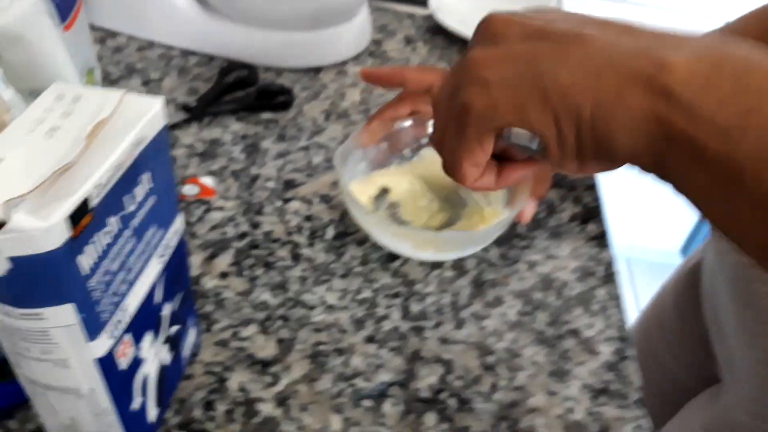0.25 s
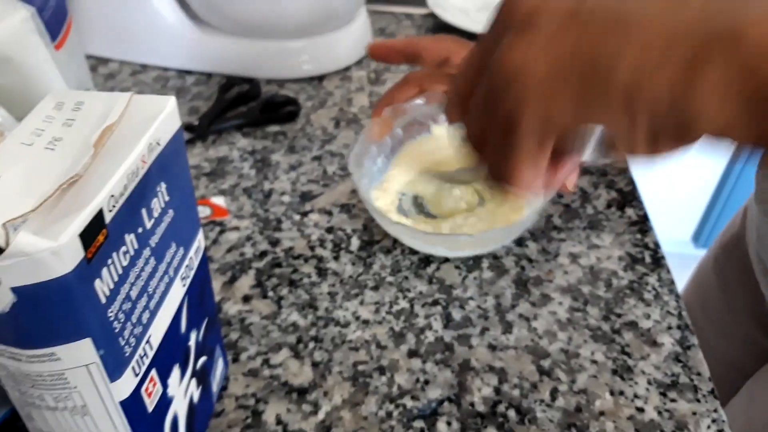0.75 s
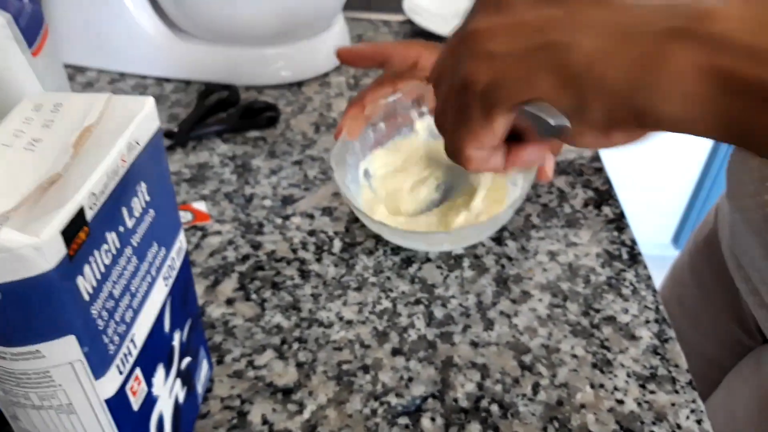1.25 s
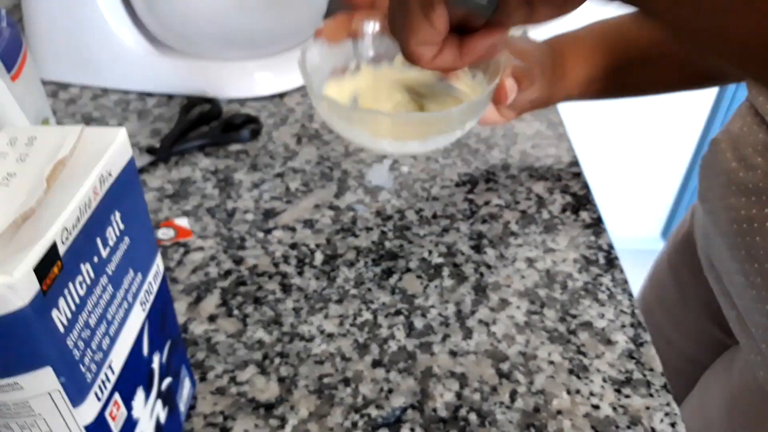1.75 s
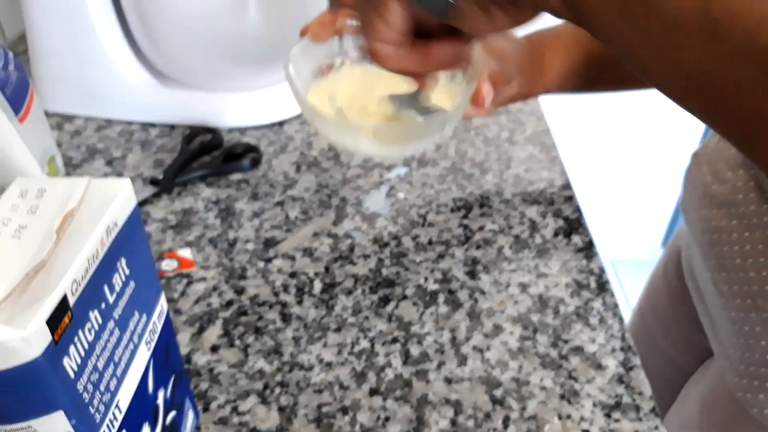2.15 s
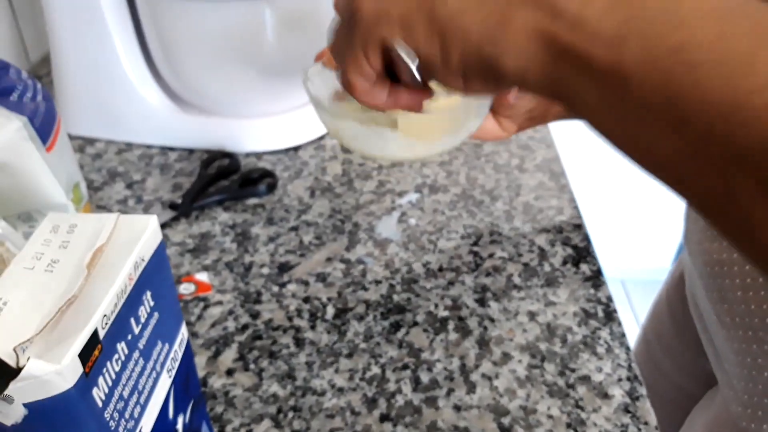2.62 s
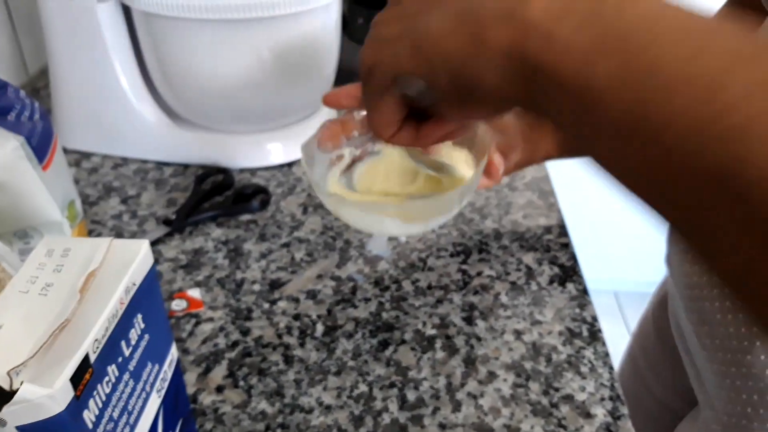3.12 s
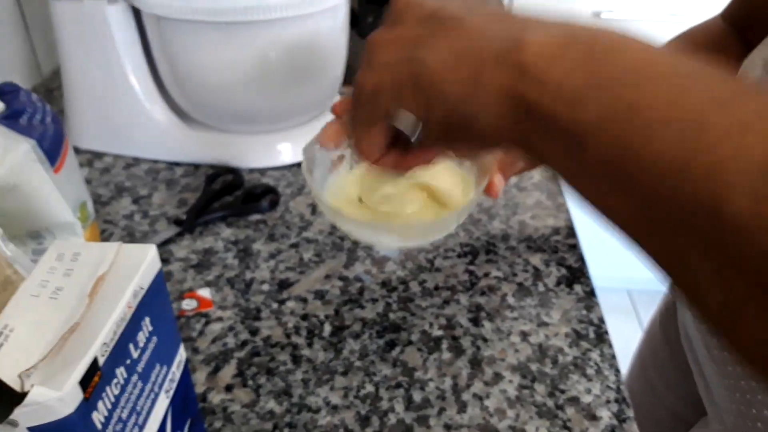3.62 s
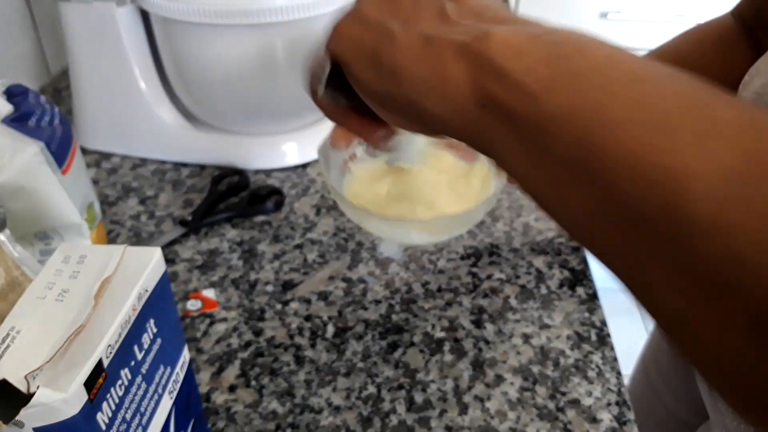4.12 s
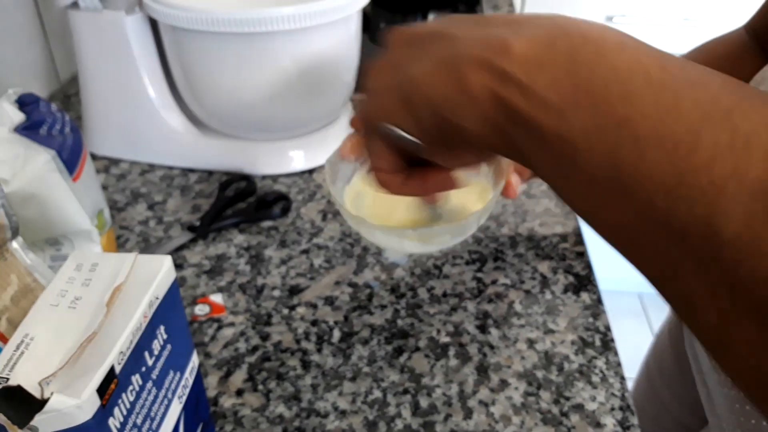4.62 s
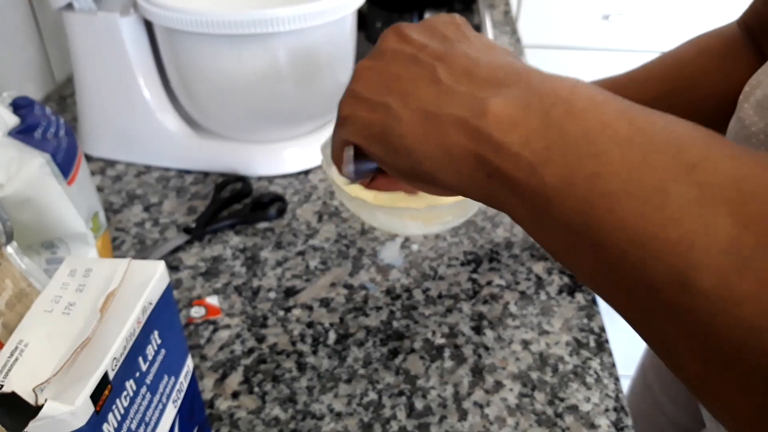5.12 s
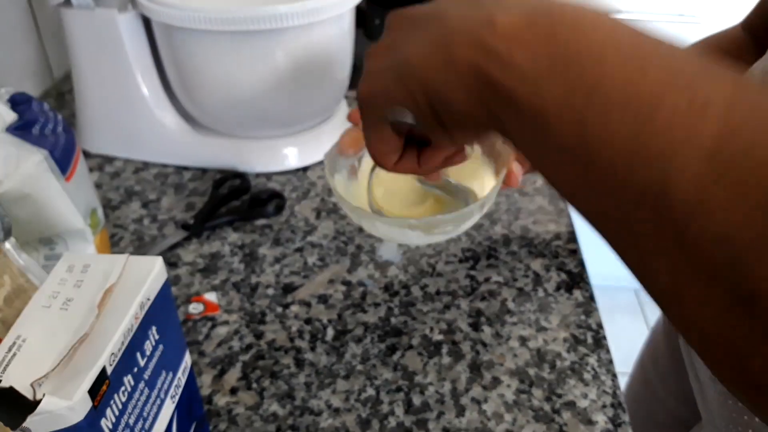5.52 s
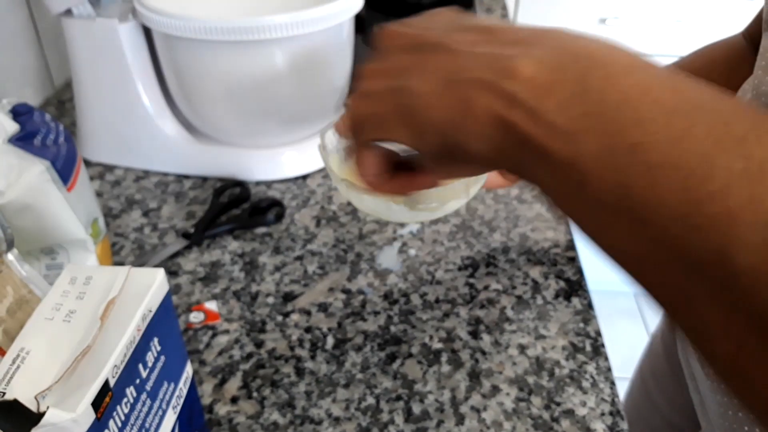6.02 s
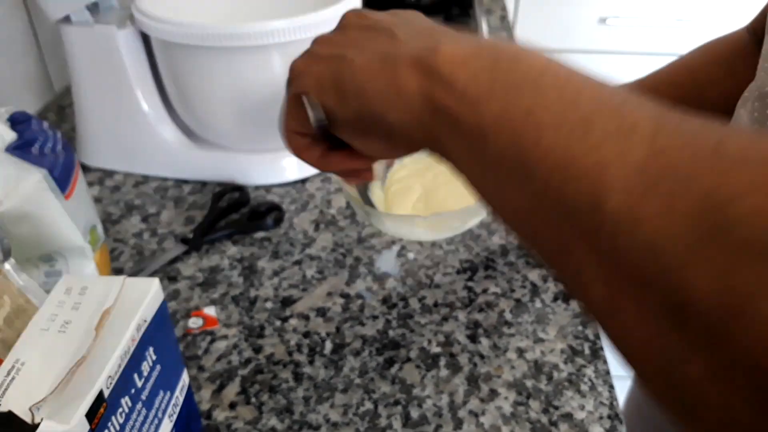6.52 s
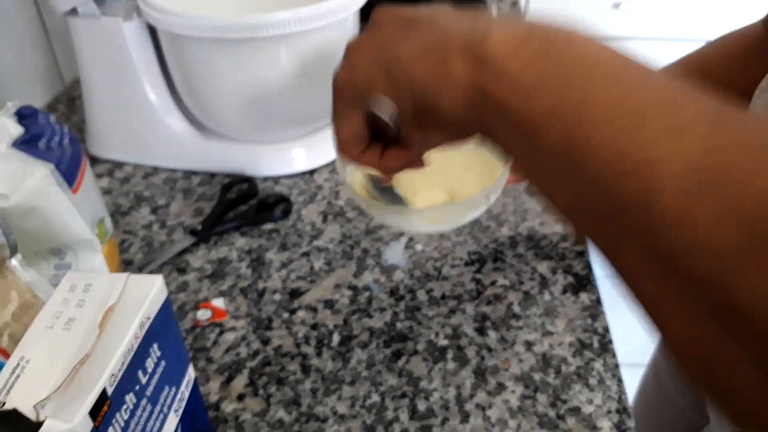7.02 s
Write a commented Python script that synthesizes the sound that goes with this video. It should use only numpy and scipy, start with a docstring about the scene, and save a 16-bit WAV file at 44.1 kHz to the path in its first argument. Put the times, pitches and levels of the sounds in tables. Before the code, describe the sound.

A metal spoon stirs thick paste in a small glass bowl, making short, bright, chattering clinks about four times a second. Between them the paste squelches softly and the spoon scrapes the glass. At first the bowl knocks and slides on a stone counter; then small wet smacks join in, along with a couple of faint squeaks near the end. The sound is close, in a quiet kitchen with a faint hum.

```python
"""A metal spoon stirs thick paste in a small hand-held glass bowl, in a hard-walled, faintly humming
kitchen. For the first second and a half the bowl knocks and slides on the stone counter. Throughout,
about four strokes a second, impacts excite the modes of the glass in chattering clinks, and between them
the paste squelches and the spoon rubs and grazes the wall. From about one second on, air pockets burst
with wet smacks. Stick-slip friction squeaks faintly near the start and twice more towards the end."""
import sys
import numpy as np
from scipy import signal
from scipy.fft import rfft, irfft, next_fast_len
from scipy.io import wavfile
from scipy.ndimage import uniform_filter1d, minimum_filter1d

SR = 44100
rng = np.random.default_rng(int(sys.argv[2]) if len(sys.argv) > 2 else 0)


def generate_wav(sig):
    """Save sig (samples, or channels by samples) to the path in sys.argv[1] as 16-bit PCM at SR."""
    pcm = np.round(np.clip(np.atleast_2d(sig).T, -1, 1) * 32767).astype(np.int16)
    wavfile.write(sys.argv[1], SR, pcm)


N = 320166
TIME_S = np.arange(N) / SR
CONTACT_N = int(.45 * SR)  # samples given to one contact and its decay
CONTACT_S = np.arange(CONTACT_N) / SR


def from_db(db):
    """Amplitude ratio of a level in decibels."""
    return 10 ** (np.asarray(db) / 20)


def unit(x):
    """Normalisation to unit energy."""
    return x / np.sqrt(np.sum(x ** 2) + 1e-20)


def colour(x, spectrum):
    """Minimum-phase filter: folding the cepstrum makes the (frequency_hz, gain_db) response causal."""
    size = 2 * next_fast_len(len(x) // 2 + CONTACT_N // 4)
    hz, db = np.transpose(spectrum)
    gain_db = np.interp(np.log(np.fft.rfftfreq(size, 1 / SR) + 1), np.log(hz), db)
    cepstrum = irfft(np.log(from_db(gain_db)))
    cepstrum[1:size // 2] *= 2
    cepstrum[size // 2 + 1:] = 0
    return irfft(rfft(x, size) * np.exp(rfft(cepstrum)))[:len(x)]


def decay(t60):
    """Damping: an exponential fall of 60 dB in t60 seconds."""
    return from_db(-60 * CONTACT_S / t60)


def reverberation(t60):
    """A diffuse field responds to an impulse with decaying noise."""
    return unit(rng.standard_normal(CONTACT_N) * decay(t60))


def click(spectrum):
    """Impulse response of the given spectrum, at unit energy."""
    return unit(colour(1.0 * (CONTACT_S == 0), spectrum))


def radiate(x, low_hz):
    """Radiation efficiency: small bodies give off little bass."""
    highpass = signal.butter(2, low_hz, "high", fs=SR, output="sos")
    return signal.sosfilt(np.tile(highpass, (2, 1)), x)


def drift(per_s):
    """Random modulation: straight lines between Gaussian values."""
    knots = rng.standard_normal(int(per_s * N / SR) + 2)
    return np.interp(TIME_S * per_s, np.arange(len(knots)), knots)


def kitchen(source, near_db=-2, near_t60=0.13, tail_db=-1, tail_t60=0.28, directions=3):
    """Superposition of direct sound, counter echoes and room tail; each direction draws source() anew."""
    out = source()
    for _ in range(directions):
        near = from_db(near_db) * reverberation(near_t60)
        tail = from_db(tail_db) * reverberation(tail_t60)
        echoes = (near + tail) / np.sqrt(directions)
        out = out + signal.fftconvolve(source()[:CONTACT_N // 4], echoes)[:len(out)]
    return out


def chatter(body, settle_s, rebounds_per_s=9000):
    """Convolution with a dying run of tiny rebounds as a contact settles; unit energy."""
    rebounds = (rng.random(CONTACT_N) < rebounds_per_s / SR) * rng.standard_normal(CONTACT_N)
    rebounds[0] = 1
    onset = 1 - np.exp(-(CONTACT_S + 1 / SR) / .0002)
    force = rebounds * onset * np.exp(-CONTACT_S / (settle_s + .0006))
    return unit(signal.fftconvolve(body, force[:CONTACT_N // 4])[:CONTACT_N])


def grains(spectrum, per_s, clump_db, q, bands=24):
    """Shot noise: clumps of tiny impulses excite resonators and are blurred by the room; rms 1."""
    pops, shared = np.zeros(N), drift(70)
    for hz in np.geomspace(max(spectrum[0][0], 80), min(spectrum[-1][0], 15000), bands):
        born = rng.random(N) < per_s / SR / bands
        clumps = np.clip(.6 * shared + .8 * drift(110), -2, 2.3)
        impulses = np.full(N, 1e-18)
        impulses[born] = from_db(clump_db * clumps[born]) * rng.standard_normal(N // 4)[:born.sum()]
        b, a = signal.iirpeak(hz, q, fs=SR)
        pops += np.sqrt(hz) * unit(signal.lfilter(b, a, signal.lfilter(b, a, impulses)))
    echoes = signal.fftconvolve(pops, from_db(-0.5) * reverberation(t60=0.086))[:N]
    return np.sqrt(N) * unit(colour(pops + echoes, spectrum))


# Limits of the five bands that set a contact's timbre: edge_hz
BAND_EDGES = [300, 800, 2800, 5200, 10000, 16000]
def place(track, start_s, sound, band_db):
    """Equalisation brings a contact's first 25 ms to five band levels; it is mixed in at start_s."""
    count, size = int(.025 * SR), next_fast_len(2 * CONTACT_N)
    hz = np.fft.rfftfreq(size, 1 / SR)
    centres_hz = np.sqrt(np.multiply(BAND_EDGES[:-1], BAND_EDGES[1:]))
    for _ in range(2):
        power = 2 * abs(rfft(sound[:count], size)) ** 2 / (size * count)
        now_db = 10 * np.log10(np.histogram(hz, BAND_EDGES, weights=power)[0] + 1e-20)
        sound = colour(sound, np.column_stack([centres_hz, band_db - now_db]))
    at = round(start_s * SR)
    track[at:at + len(sound)] += sound[:N - at]


# Normal modes of bowl and spoon: pitch_hz, level_db
GLASS_MODES = [(1000, -4.5), (1255, -14.5), (1492, -6), (1797, -15.5), (2205, -16.5), (3565, -9),
               (3770, -6), (4000, -24), (4290, -8), (4720, -11), (6100, 2), (6760, -3.5), (8150, -16),
               (8620, 6), (9030, 1), (11310, -5)]
def ring(modes=GLASS_MODES, t60=0.03, detune=0.0083):
    """Modal vibration: damped sines whose strength and pitch vary with grip and contact point."""
    hz, db = np.transpose(modes)
    hz = hz * (1 + detune * rng.normal(size=len(hz)))
    gains = from_db(db + 3 * rng.normal(size=len(hz))) * rng.choice([-1, 1], len(hz))
    count = CONTACT_N // 4
    waves = gains @ np.sin(2 * np.pi * hz[:, None] * CONTACT_S[:count])
    return unit(np.pad(waves, (0, CONTACT_N - count)) * decay(t60))


# Spectrum of the quiet kitchen: frequency_hz, density_db
AIR_SPECTRUM = [(20, -13), (105, 14), (260, -2.5), (600, 1), (1200, -13), (3000, 0), (16000, -2.5)]
def room_tone(air_db=-63.5, hum_hz=104, hum_db=-80):
    """Ambient noise floor: broadband air and the pure tone of an appliance's hum."""
    air = np.sqrt(N) * unit(colour(rng.standard_normal(N), AIR_SPECTRUM))
    return from_db(air_db) * air + from_db(hum_db) * np.sin(2 * np.pi * hum_hz * TIME_S)


# Envelope of the bowl's slide: time_s, level_db
SLIDE_LEVELS = [(0, -29.5), (.17, -51), (.27, -38.5), (.52, -48), (.76, -46), (1.03, -65.5), (1.23, -53.5),
                (1.32, -50), (1.5, -66)]
# Spectrum of glass on stone: frequency_hz, density_db
SLIDE_SPECTRUM = [(40, -26), (90, 9.5), (180, 13.5), (300, 3.5), (1100, 12.5), (1600, 8.5), (5000, 3)]
def bowl_slide():
    """Sliding friction of the bowl on the counter, sinking to a faint, steady trace."""
    level_db = np.interp(TIME_S, *np.transpose(SLIDE_LEVELS))
    return from_db(level_db) * grains(SLIDE_SPECTRUM, per_s=4800, clump_db=2.5, q=1)


# The bowl rocks on the counter: start_s, level_db, settle_s
BOWL_KNOCKS = [(0.004, -33.5, 0.024), (0.2487, -32.5, 0.0023), (0.3068, -32, 0.0015),
               (0.3872, -35.5, 0.00075), (0.4988, -22.5, 0.0014), (0.7526, -43.5, 0.006),
               (1.3016, -28, 0.0033), (1.52, -35.5, 0.00039)]
# Timbre of a knock, one value a band: offset_db
KNOCK_BANDS = [-14, 2, -12, -15, -16]
def bowl_knocks(glass_db=-8):
    """Damped impact: the bowl's foot meets stone with a dull clack that rings the low modes."""
    out = np.zeros(N)
    thud = click([(100, 5), (210, 5), (330, 5.5), (1050, 13), (2300, -10.5), (3500, -34), (16000, 0.5)])
    low_modes = [(hz, db) for hz, db in GLASS_MODES if hz < 2800]
    for start_s, level_db, settle_s in BOWL_KNOCKS:
        def clack():
            return chatter(thud + from_db(glass_db) * ring(low_modes, t60=0.04), settle_s)
        place(out, start_s, radiate(kitchen(clack), low_hz=92.5), np.add(KNOCK_BANDS, level_db))
    return out


def sweep(start_s, end_s, attack_s=0.013, rise_db_per_s=1.5, release_db_per_s=254):
    """Amplitude envelope of one sweep: quick attack, slightly rising hold, exponential release."""
    attack = np.clip((TIME_S - start_s) / attack_s, 0, 1)
    hold_db = rise_db_per_s * (np.clip(TIME_S, start_s, end_s) - (start_s + end_s) / 2)
    release_db = release_db_per_s * np.maximum(TIME_S - end_s, 0)
    return attack * from_db(hold_db - release_db)


# Sweeps of the spoon through the paste: start_s, end_s, squelch_db, rub_db
SPOON_SWEEPS = [(0.054, 0.434, -51, -48), (0.575, 0.885, -44, -61), (1.05, 1.117, -46.5, -51),
                (1.24, 1.393, -51.5, -46.5), (1.534, 1.703, -51.5, -48.5), (1.822, 2.17, -54.5, -55),
                (2.22, 2.39, -52.5, -52), (2.695, 2.877, -50, -54), (3, 3.255, -54, -49.5),
                (3.388, 3.67, -48, -57), (3.76, 4.07, -59.5, -49.5), (4.214, 4.556, -61.5, -50.5),
                (4.714, 5.153, -56.5, -49.5), (5.308, 5.517, -55.5, -51), (5.546, 5.73, -57.5, -52.5),
                (5.81, 6.364, -54.5, -56), (6.424, 6.54, -53, -55.5), (6.70, 6.778, -50, -47),
                (6.95, 7.233, -49, -51.5)]
# Spectra of squelching paste, rubbed glass and snapping threads: frequency_hz, density_db
SQUELCH_SPECTRUM = [(150, -37), (300, -3.5), (550, 1.5), (1020, 11), (1600, 2), (3000, -20.5), (6000, -29)]
RUB_SPECTRUM = [(1200, -32), (2500, 6), (3800, 3), (5200, 2), (8000, -7.5), (9500, 8.5), (11500, -22),
                (16000, -6)]
THREAD_SPECTRUM = [(4000, -11.5), (9500, -5), (16000, -8.5)]
def stirring(paste_trim_db=-1.5, wall_trim_db=-1, thread_trim_db=-8):
    """Shear and friction: each sweep squelches the paste, rubs the wall and snaps sticky threads."""
    paste_gain, wall_gain = np.zeros((2, N))
    for start_s, end_s, squelch_db, rub_db in SPOON_SWEEPS:
        envelope = sweep(start_s, end_s)
        paste_gain += from_db(squelch_db) * envelope
        wall_gain += from_db(rub_db) * envelope
    paste = from_db(paste_trim_db) * grains(SQUELCH_SPECTRUM, per_s=4500, clump_db=8.5, q=1.8)
    wall = from_db(wall_trim_db) * grains(RUB_SPECTRUM, per_s=15000, clump_db=9, q=9.1)
    threads = from_db(thread_trim_db) * grains(THREAD_SPECTRUM, per_s=2000, clump_db=11.5, q=1.8)
    return paste_gain * paste + wall_gain * wall + np.hypot(paste_gain, wall_gain) * threads


# The spoon drags on wet glass: centre_s, pitch_hz, level_db, half_length_s
SPOON_SQUEAKS = [(0.9, 4240, -49.5, 0.061), (5.117, 2630, -37, 0.021), (6.18, 1720, -35, 0.015)]
def squeaks(bandwidth_hz=220):
    """Stick-slip friction briefly drives one narrow resonance."""
    out = np.zeros(N)
    for centre_s, pitch_hz, level_db, half_length_s in SPOON_SQUEAKS:
        b, a = signal.iirpeak(pitch_hz, pitch_hz / bandwidth_hz, fs=SR)
        tone = np.sqrt(N) * unit(signal.lfilter(b, a, rng.standard_normal(N)))
        out += from_db(level_db) * tone * np.exp(-((TIME_S - centre_s) / half_length_s) ** 2)
    return out


# Air pockets burst in the paste: start_s, level_db, brightness_db
AIR_POCKETS = [(1.092, -54, -12), (1.4332, -44, -2.5), (1.6486, -45.5, -28), (1.9035, -53, 4.5),
               (2.0672, -45.5, -34), (2.1009, -60, 7.5), (2.2975, -41, -10), (2.4927, -47, -6),
               (2.6262, -40, 2.5), (3.0213, -46.5, -16), (3.264, -52.5, -17), (3.481, -45, -10.5),
               (3.6891, -44, -5.5), (3.8882, -38.5, 4.5), (3.97, -53.5, 3), (4.5771, -40.5, 0.5),
               (4.773, -41.5, 0.5), (4.9652, -51, 3.5), (5.6717, -47, -4), (5.8653, -45, -2.5),
               (5.9043, -48, -7.5), (5.961, -49, -5), (6.115, -45.5, -1.5), (6.8, -44.5, -9),
               (7.0186, -40.5, 1.5)]
# Spectrum of a wet smack: frequency_hz, density_db
SMACK_SPECTRUM = [(100, -21), (250, -17), (400, -9.5), (620, 1), (1000, -2.5), (3000, -6), (9500, 0),
                  (16000, -3)]
def smacks(glass_db=-15):
    """Pressure release: a pocket pops, brightly if near the surface, and barely rings the glass."""
    out, snap = np.zeros(N), click(SMACK_SPECTRUM)
    def pop():
        return chatter(snap + from_db(glass_db) * ring(t60=0.072), settle_s=0.0035)
    for start_s, level_db, brightness_db in AIR_POCKETS:
        smack = radiate(kitchen(pop, near_db=-3.5, near_t60=0.085), low_hz=273)
        shape_db = [0, 1 + 0.22 * brightness_db, brightness_db, brightness_db - 1, brightness_db - 5]
        place(out, start_s, smack, np.add(shape_db, level_db))
    return out


# Spectrum of metal meeting glass: frequency_hz, density_db
CRACK_SPECTRUM = [(100, -38.5), (280, -25.5), (550, -6), (1050, -0.5), (2800, -11), (3700, -14), (5300, 0),
                  (6400, 8.5), (9400, 5.5), (10700, -4), (16000, -13)]
def contact_crack(gain_db=4):
    """Contact transient: a brief force gives a dry, broadband crack."""
    return from_db(gain_db) * click(CRACK_SPECTRUM)


# The spoon's edge skips along the wall: start_s, level_db, brightness_db, settle_s
SPOON_GRAZES = [(0.7894, -42.5, -5.5, 0.0027), (0.851, -70, -5, 0.003), (0.91, -55, 0.5, 0.0037),
                (2.824, -52.5, 1.5, 0.002), (2.957, -46.5, -6, 0.028), (3.992, -41.5, -5, 0.0045),
                (4.1284, -31.5, -0.5, 0.0093), (4.1594, -35.5, -2, 0.004), (4.262, -33.5, -1, 0.0005),
                (5.0636, -48.5, -0.5, 0.016), (5.1045, -44, -9, 0.014), (5.256, -43, -1.5, 0.00078),
                (5.288, -40, -2.5, 0.006), (5.422, -55, -11, 0.001), (6.159, -46.5, 1, 0.009),
                (6.4572, -43.5, -2.5, 0.022), (6.498, -41.5, -7.5, 0.005), (6.5758, -51, 5.5, 0.0075),
                (6.5931, -40.5, 3, 0.02), (6.8487, -38, -1, 0.026)]
# Modes of the spoon's edge: pitch_hz, level_db
EDGE_MODES = [(2700, -0.5), (4000, 1)]
def grazes(edge_db=-7, thump_db=-68):
    """Oblique impact: a light touch rings the spoon's edge but hardly moves the body of the bowl."""
    out, crack = np.zeros(N), contact_crack()
    for start_s, level_db, brightness_db, settle_s in SPOON_GRAZES:
        def skip():
            glass = ring(t60=0.041)
            edge = from_db(edge_db) * ring(EDGE_MODES, t60=0.012, detune=0.04)
            return chatter(glass + edge + crack, settle_s)
        body_db, treble_db = -38 + 0.3 * level_db, level_db + brightness_db
        band_db = [thump_db, body_db, level_db, treble_db, treble_db - 6.5]
        place(out, start_s, radiate(kitchen(skip, directions=5), low_hz=367), band_db)
    return out


# The spoon strikes the glass: start_s, level_db, brightness_db, body_offset_db, low_hz, main_hz
SPOON_STRIKES = [(0.2166, -20.5, -2.5, -10, 1240, 4810), (0.4632, -22.5, -1, -7.5, 1080, 4400),
                 (0.6993, -29, 0, -0.5, 1390, 4500), (1.1889, -37.5, 0, 1, 843, 4900),
                 (1.4576, -25.5, 1, -9.5, 935, 3870), (1.7226, -21, 0.5, -13, 2380, 4060),
                 (1.7587, -30.5, -13, -6.5, 1040, 3320), (1.9468, -22.5, 3.5, -13, 895, 4550),
                 (1.975, -37.5, -12, -2, 1200, 4280), (2.1861, -29, 0, -5, 1006, 4110),
                 (2.392, -24.5, -13.5, -5, 1090, 3330), (2.7935, -39, -6.5, -1.5, 2200, 4040),
                 (3.1041, -21.5, -1, 0, 1530, 3460), (3.298, -22, 8, -8, 1460, 3510),
                 (3.3441, -28.5, -18, -1.5, 1010, 3830), (3.556, -26, -0.5, -6, 2420, 4220),
                 (4.402, -35, -7.5, 6, 1536, 3940), (4.614, -25.5, -4.5, -15.5, 1010, 4110),
                 (4.6542, -24.5, -8, -8.5, 1576, 3760), (4.8405, -21.5, -1.5, -16.5, 1540, 4250),
                 (4.8787, -32, -9, -7, 1450, 3730), (5.5148, -33.5, -14, 2, 1495, 3580),
                 (5.7412, -24.5, -5.5, -9.5, 1050, 4190), (6.025, -29, -17, -8, 1490, 3990),
                 (6.384, -37, -9.5, 0, 870, 3970), (6.648, -28.5, -8, -2.5, 1570, 3640),
                 (6.8936, -26, -6.5, -5.5, 1534, 3530), (7.0976, -26, -3.5, -13, 1560, 4700),
                 (7.1267, -23, -7.5, -9.5, 920, 3450)]
def clinks(ring_db=-11):
    """Impact excites the modes of the glass; paste and grip shift two rings from blow to blow."""
    out, crack = np.zeros(N), contact_crack()
    for start_s, level_db, brightness_db, body_offset_db, low_hz, main_hz in SPOON_STRIKES:
        # A hard, bright blow rebounds briefly; a glancing, dull one chatters longer.
        settle_s = min(0.0019 * 2 ** (-brightness_db / 4), 0.0042)
        def strike():
            low = from_db(ring_db) * ring([(low_hz, 0)], t60=0.031, detune=0.034)
            main = from_db(ring_db) * ring([(main_hz, 0)], t60=0.016, detune=0.04)
            return chatter(ring(t60=0.03) + low + main + crack, settle_s)
        body_db, treble_db = level_db + body_offset_db, level_db + brightness_db
        thump_db = -32 + 0.39 * body_db  # the cushioned thump grows little with force
        band_db = [thump_db, body_db, level_db, treble_db, treble_db - 9]
        place(out, start_s, radiate(kitchen(strike, directions=5), low_hz=396), band_db)
    return out


def scene():
    """Superposition of all sources at one microphone above the counter."""
    contacts = clinks() + grazes() + smacks() + bowl_knocks()
    return (contacts + squeaks() + stirring() + bowl_slide() + room_tone())[None]


def record(dry, cutoff_hz=16100):
    """Peak limiting ducks anything above full scale; a steep low-pass cuts the top."""
    window = int(.004 * SR)
    allowed_gain = minimum_filter1d(1 / np.maximum(abs(dry), 1), window)
    limited = dry * uniform_filter1d(allowed_gain, window)
    return signal.sosfilt(signal.ellip(10, .2, 100, cutoff_hz, fs=SR, output="sos"), limited)


dry = scene()
out = record(dry)
generate_wav(out)
```